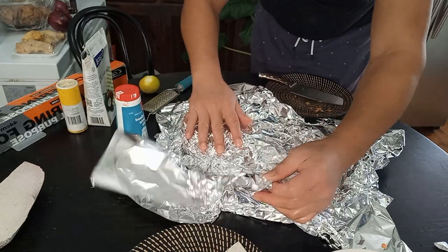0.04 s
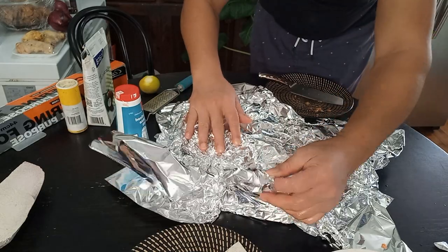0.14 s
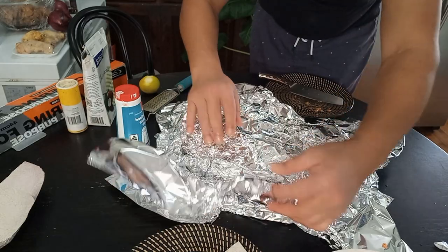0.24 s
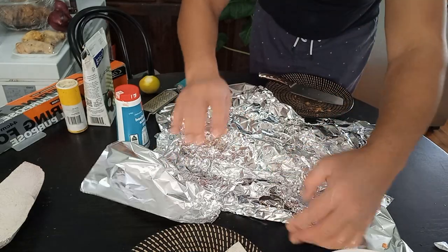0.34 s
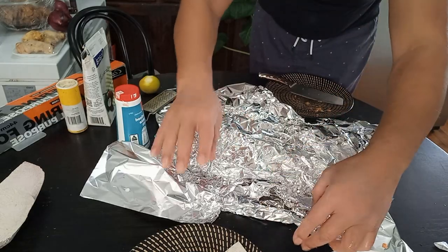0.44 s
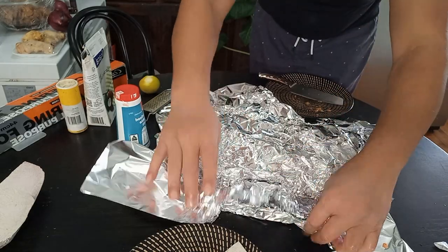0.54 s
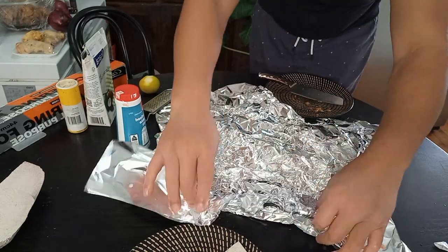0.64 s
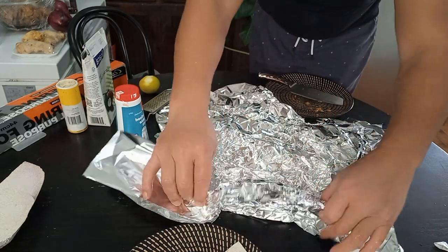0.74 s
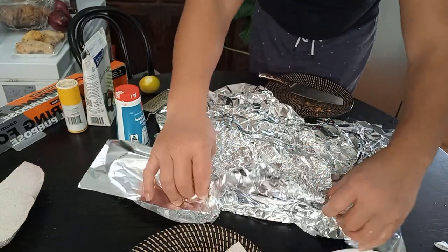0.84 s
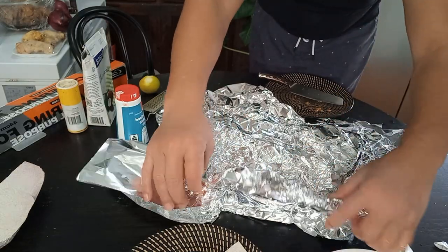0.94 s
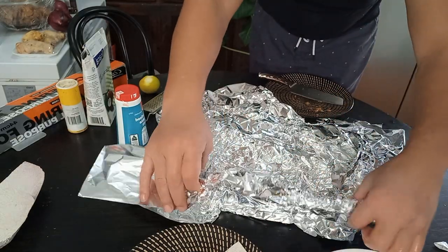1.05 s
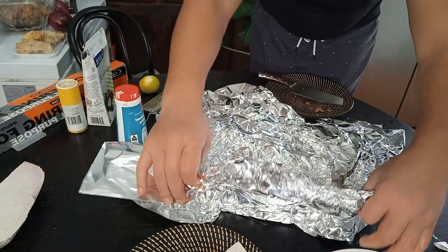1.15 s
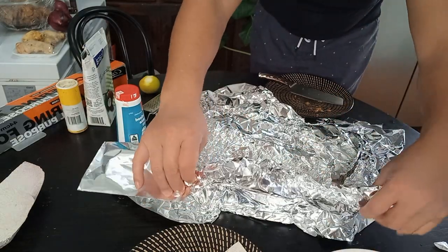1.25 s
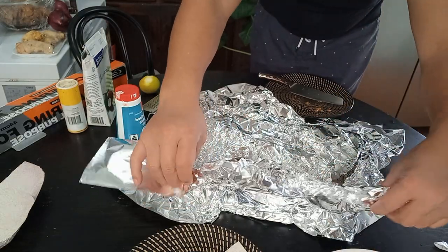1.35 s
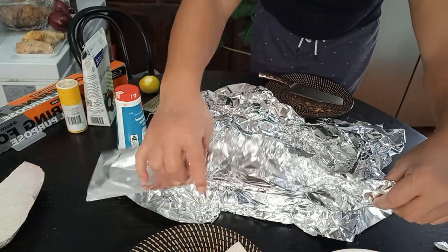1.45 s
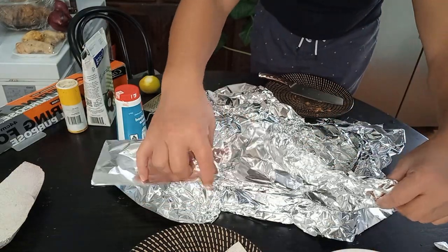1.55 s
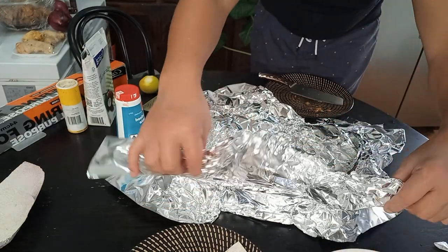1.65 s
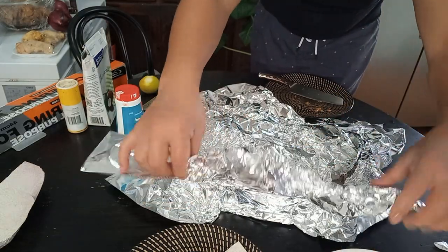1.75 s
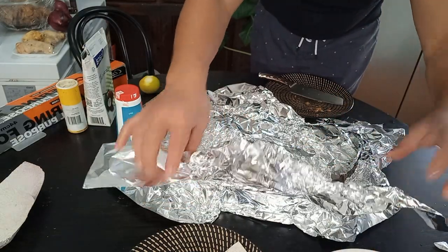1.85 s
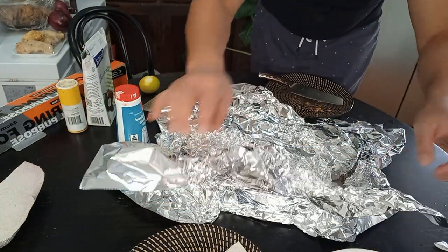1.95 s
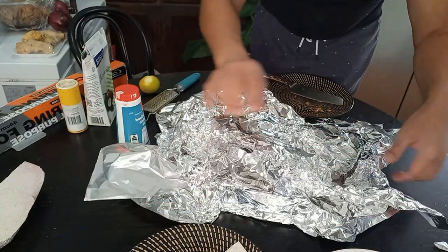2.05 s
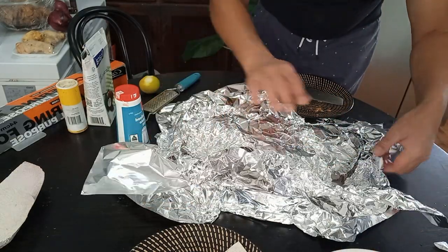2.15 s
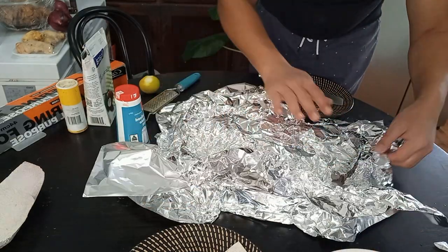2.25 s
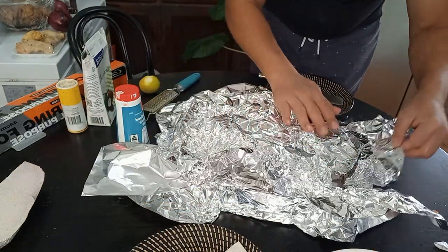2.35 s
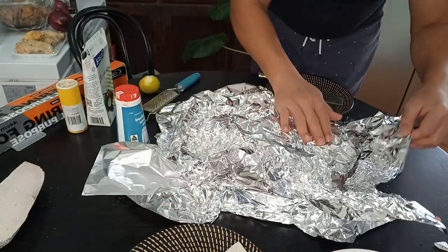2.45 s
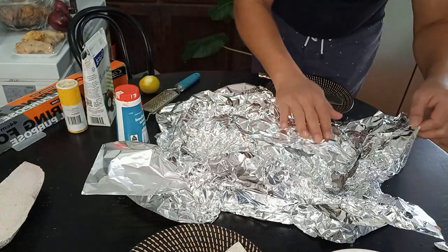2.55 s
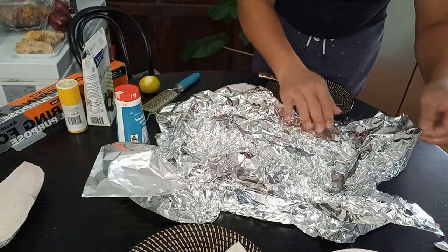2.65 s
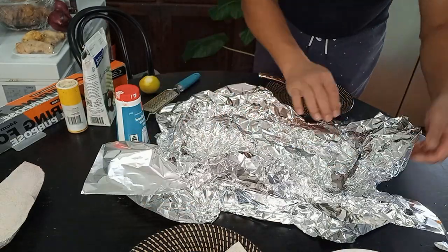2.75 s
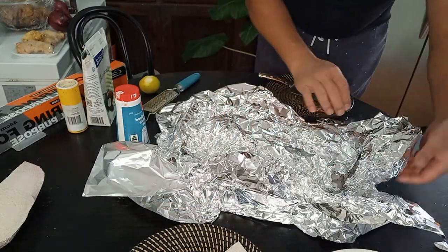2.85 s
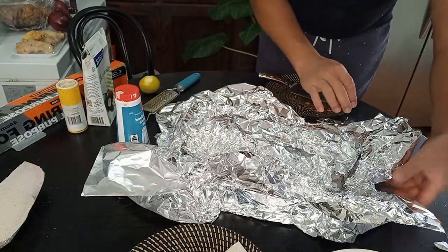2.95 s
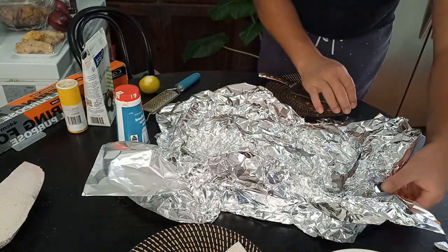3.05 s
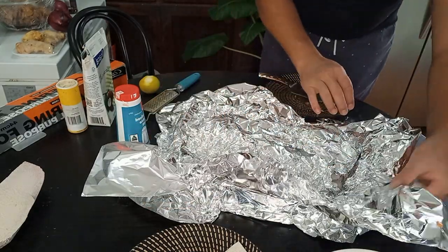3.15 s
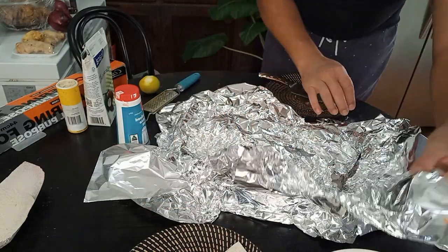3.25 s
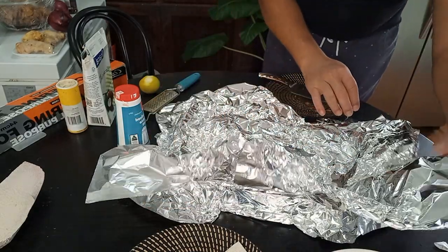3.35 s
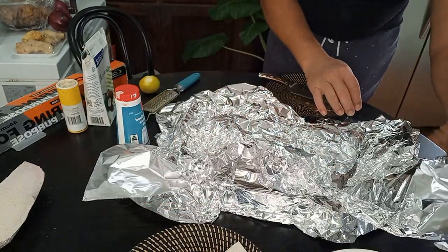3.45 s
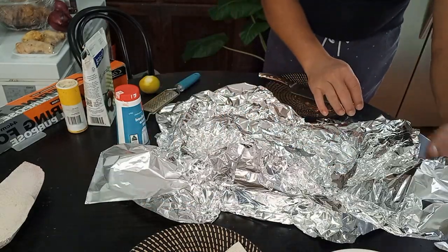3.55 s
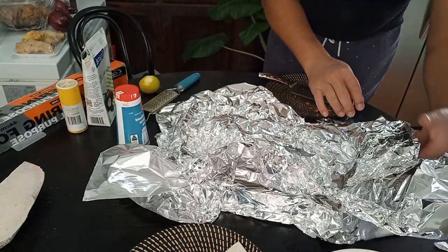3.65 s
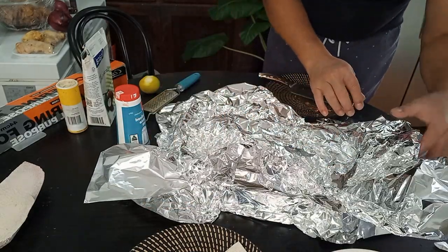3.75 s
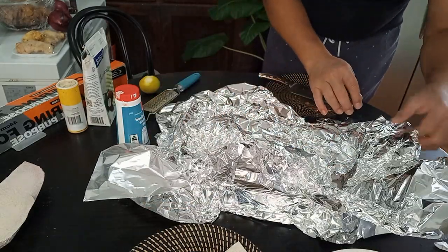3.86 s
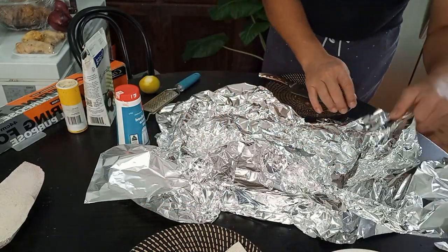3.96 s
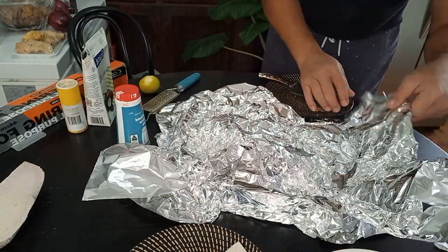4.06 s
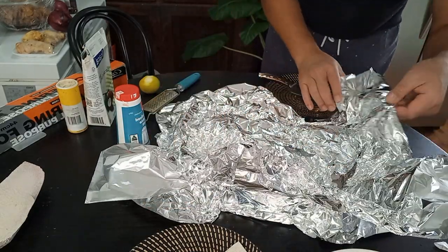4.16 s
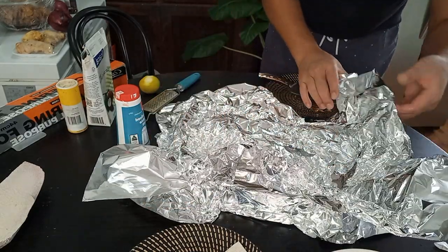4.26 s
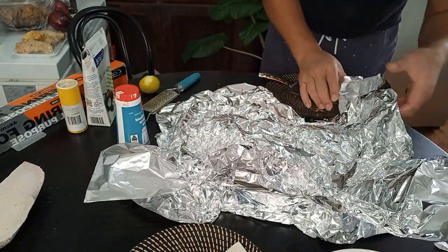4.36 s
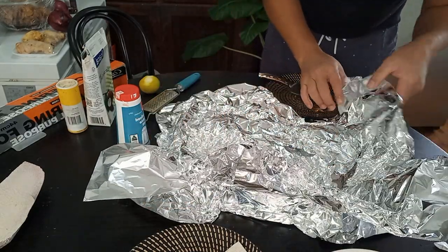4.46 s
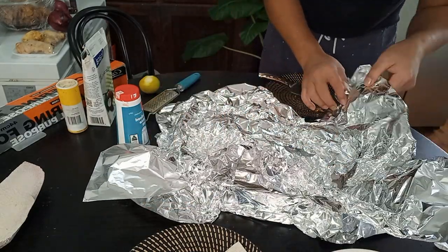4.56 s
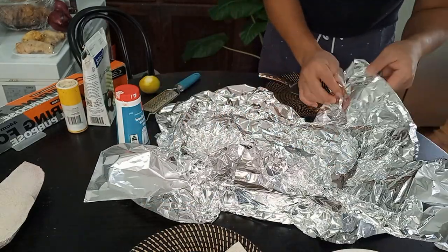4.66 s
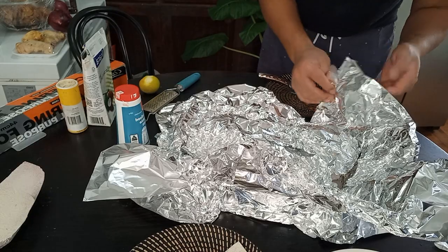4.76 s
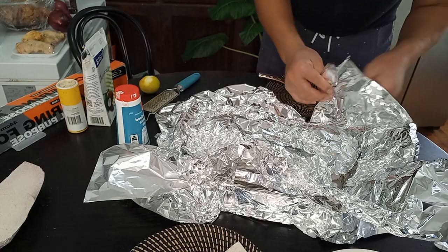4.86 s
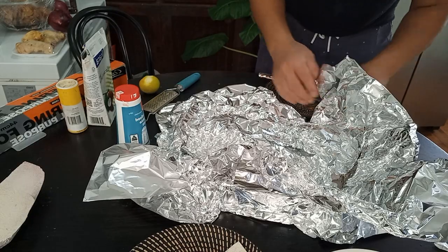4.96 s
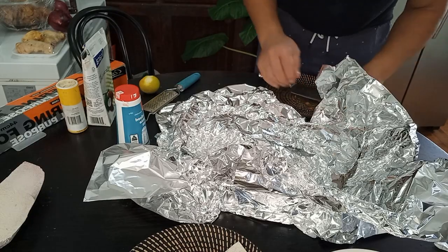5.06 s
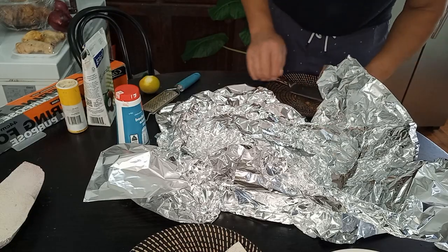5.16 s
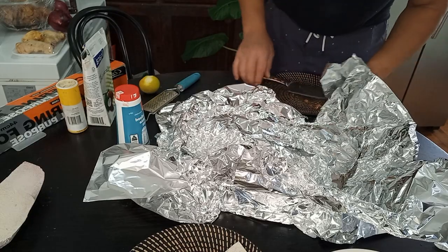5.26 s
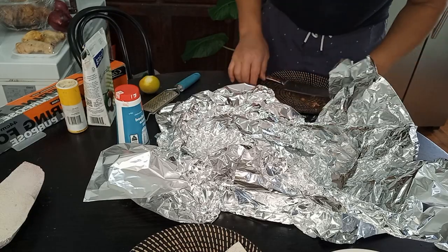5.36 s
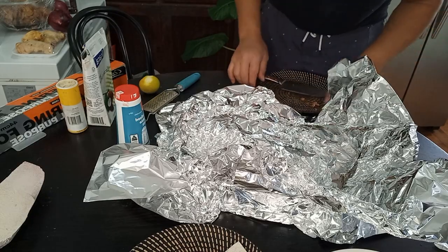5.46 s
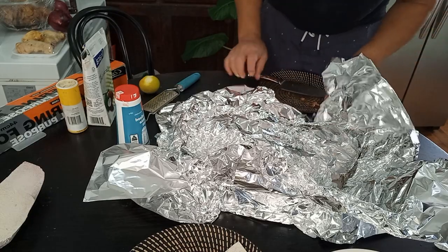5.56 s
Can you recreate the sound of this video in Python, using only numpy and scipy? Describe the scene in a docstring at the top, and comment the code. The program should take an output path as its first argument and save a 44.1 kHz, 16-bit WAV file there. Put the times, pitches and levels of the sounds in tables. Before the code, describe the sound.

Close, crisp crackling of aluminium foil comes in uneven strokes as two hands flatten and fold it. Creases snap and wider patches buckle and pop, with a few faint low thuds on the table beneath. Toward the end a woven tray briefly bumps and scrapes along the tabletop, its rim squeaking faintly under the last crinkles. The kitchen adds a short echo and a very soft rumble.

```python
"""A big crumpled sheet of aluminium foil is pressed, pulled and folded by two hands on a kitchen table.
Thousands of tiny creases snap in each stroke, wider facets (flat patches) buckle and pop, and the
hard room blends them. Now and then the weight of a hand thuds on the table. Near the end a woven
tray is nudged along the table top, with a hollow judder and a faint squeak. The room rumbles softly."""
import sys
import numpy as np
from scipy import signal
from scipy.fft import rfft, irfft, next_fast_len
from scipy.io import wavfile

SR = 44100
rng = np.random.default_rng(int(sys.argv[2]) if len(sys.argv) > 2 else 0)


def store_wav(level_fs):
    """Save 16-bit WAV to argv[1]."""
    pcm = np.round(np.clip(np.atleast_2d(level_fs), -1, 1) * 32767)
    wavfile.write(sys.argv[1], SR, pcm.T.astype(np.int16))


N = 247092
T = np.arange(N) / SR

# Levels in the tables are relative: the functions add their own gains.
# Each push or pull of the hands: (start [s], length [s], fine crease level [dB], swell [dB],
# facets relative to fine creases [dB], whole-sheet flexing relative to fine creases [dB])
HAND_STROKES = [(-0.036, 0.033, -22, 0.5, -5, -10), (0.019, 0.14, -37, 2, -8.5, -19.5),
                (0.192, 0.1, -40, 0, -7.5, -23.5), (0.32, 0.11, -50.5, 0, -17.5, -24),
                (0.584, 0.076, -40.5, -4, -17, -22), (0.668, 0.15, -30, -1, -8, -16.5),
                (0.825, 0.15, -25.5, -8.5, -8.5, -17), (0.952, 0.15, -35, 2, -11, -24.5),
                (1.107, 0.28, -35.5, -4, -10, -21.5), (1.383, 0.33, -31, -0.5, -10.5, -22),
                (1.742, 0.074, -35, 2, -9, -21), (1.856, 0.15, -40, -18, -7.5, -25),
                (2.13, 0.06, -61, 8, -12, -16), (2.188, 0.217, -46.5, 15, -5.5, -17),
                (2.415, 0.17, -35, 3.5, -7, -15), (2.602, 0.1, -48.5, 1, -9, -20.5),
                (2.891, 0.099, -50.5, 9, -6.5, -16), (3.008, 0.28, -47, 18, -11, -21.5),
                (3.282, 0.1, -29.5, 1, -8, -13.5), (3.622, 0.13, -34, -10.5, -6, -21.5),
                (3.888, 0.18, -46.5, 12, -12.5, -21.5), (4.091, 0.15, -27.5, -9, -9.5, -17.5),
                (4.233, 0.085, -44, 5, -15, -19.5), (4.47, 0.075, -44.5, 9.5, -25, -30),
                (4.524, 0.23, -33.5, 4, -8.5, -13.5), (4.798, 0.17, -30.5, -14.5, -8.5, -19),
                (4.968, 0.36, -53, 7, -14, -19), (5.188, 0.24, -39, -7, -8.5, -15),
                (5.418, 0.12, -51.5, -11, -0.5, -0.5), (5.522, 0.084, -55.5, 24, -12, -19)]
# How long the fingers take to grip: (fine creases [s], facets [s], whole sheet [s])
GRIP_TIMES = (0.039, 0.038, 0.041)
# How long the foil takes to fade 60 dB once let go: (fine creases [s], facets [s], whole sheet [s])
SETTLE_TIMES = (0.16, 0.17, 0.17)
# A fold gives way: (time [s], level [dB])
FOLD_SNAPS = [(0.115, -28.5), (0.354, -36), (0.403, -31.5), (0.471, -39.5), (0.545, -48), (0.601, -38.5),
              (0.687, -31), (1.081, -24), (1.394, -23), (1.619, -18.5), (1.777, -30), (1.798, -29),
              (1.884, -28), (2.04, -50), (2.165, -44), (2.179, -42), (2.217, -33.5), (2.789, -41.5),
              (2.913, -36), (2.964, -35.5), (3.044, -30), (3.131, -26.5), (3.315, -20), (3.528, -45),
              (3.636, -42), (4.124, -27), (4.489, -35), (4.833, -38), (5.204, -38), (5.581, -32)]
# A panel of the sheet flips over or is patted down: (time [s], level [dB], pitch [Hz])
PANEL_POPS = [(0.001, -16, 461), (0.002, -32, 333), (0.009, -19, 548), (0.012, -27, 1090),
              (0.028, -30, 594), (0.703, -28.5, 690), (0.72, -31, 414), (0.727, -27, 617),
              (0.868, -29, 1340), (0.875, -33.5, 483), (0.934, -32, 1120), (2.407, -24.5, 690),
              (2.486, -29.5, 1100), (2.511, -37, 617), (2.591, -23.5, 2380), (3.082, -40, 586),
              (3.315, -26.5, 1570), (3.357, -31, 990), (3.371, -30.5, 437), (3.734, -35.5, 686),
              (4.605, -33.5, 374), (4.637, -31, 510), (4.652, -26, 435), (4.68, -28.5, 426),
              (4.704, -30, 368), (4.833, -32.5, 537)]
# A hand lands on the table: (time [s], level [dB], pitch [Hz])
HAND_THUDS = [(1.03, -54, 60), (1.59, -48, 56.4), (1.65, -63, 68.6), (3.32, -48, 70.6), (4.12, -55, 83),
              (4.57, -60, 60), (5.48, -53.5, 104)]
# The tray catches and slips: (time [s], level [dB], pitch [Hz])
TRAY_BUMPS = [(5.11, -55.5, 323), (5.287, -39.5, 260), (5.307, -35.5, 270), (5.335, -40, 267),
              (5.356, -39, 330), (5.435, -37.5, 238), (5.448, -43, 152), (5.455, -42, 313),
              (5.47, -43, 304)]
# The tray rubs along the table: (time [s], level [dB])
TRAY_RUB = [(5.17, -76), (5.23, -57), (5.3, -51.5), (5.39, -59.5), (5.47, -53), (5.51, -63), (5.6, -60)]
# The tray's rim squeaks: (time [s], pitch [Hz], level [dB])
RIM_SQUEAK = [(5.42, 1300, -83), (5.45, 1290, -60), (5.51, 1260, -68), (5.54, 1200, -59), (5.58, 1207, -61),
              (5.6, 1240, -56)]
# The tone of fine creases, facets, flexing sheet, tray and quiet room: (frequency [Hz], level [dB])
CREASE_SPECTRUM = [(400, -20), (1500, -18), (3000, -8.5), (4300, -3), (6700, -3), (7500, -0.7), (8150, -5),
                   (8800, -5), (10200, -2.5), (12300, 0), (14000, 0), (16000, -2)]
FACET_SPECTRUM = [(200, -45), (600, -15.5), (1100, -4), (1700, -1), (2500, -2.5), (3600, -4.5),
                  (7000, -16.5)]
FLEX_SPECTRUM = [(50, -38), (130, -17), (240, -11), (370, -2), (540, 0), (800, -1.5), (1200, -13.5),
                 (3000, -42)]
TRAY_SPECTRUM = [(50, -31), (140, -11), (210, -15), (280, -4.5), (360, -1.5), (480, -34), (800, -27),
                 (2000, -43)]
ROOM_SPECTRUM = [(20, -20), (36, -5), (48, -7), (62, 5.5), (75, -7), (100, -6.5), (130, -9), (250, -15.5),
                 (600, -18), (1100, -19.5), (2000, -24.5), (4000, -36), (16000, -36)]
# How long the kitchen's echo lasts: (frequency [Hz], time to fade 60 dB [s])
ROOM_DECAY = [(250, 0.18), (700, 0.25), (1800, 0.3), (4500, 0.34), (8000, 0.34), (14000, 0.19)]


def amp(db):
    """Turns decibels into a gain to multiply by."""
    return 10 ** (np.asarray(db) / 20)


def unit_rms(x):
    """Scales a signal so that its average level (rms) is 1."""
    return x / np.sqrt(np.mean(x ** 2) + 1e-20)


def value_at(table, hz):
    """Looks up a table's value on a log-frequency axis."""
    table_hz, values = np.transpose(table)
    return np.interp(np.log(hz + 1), np.log(table_hz), values)


def follow(table):
    """Joins a table's timed points with straight lines, one curve per column."""
    times, *columns = np.transpose(table)
    return [np.interp(T, times, column) for column in columns]


def add(mix, start_s, sound):
    """Mixes a sound into every channel at the given time."""
    part = mix[:, max(round(start_s * SR), 0):][:, :sound.shape[-1]]
    part += sound[..., :part.shape[1]]


def colour(x, spectrum):
    """Gives a flat signal the tone of a spectrum table, at rms 1."""
    size = next_fast_len(N)
    gain = amp(value_at(spectrum, np.fft.rfftfreq(size, 1 / SR)))
    return unit_rms(irfft(rfft(x, size) * gain, size)[:, :N])


def diffuse(spectra, hz, ear_gap_s=0.00042):
    """Sound from all sides: left and right share the bass but not the treble."""
    shared = .88 * np.sinc(2 * hz * ear_gap_s)
    return np.array([spectra[0], shared * spectra[0] + np.sqrt(1 - shared ** 2) * spectra[1]])


def flicker(depth_db, per_s):
    """A factor that wanders at random around 1."""
    points = rng.standard_normal(4096)
    return amp(depth_db * np.interp(T * per_s, np.arange(len(points)), points))


def crackle(per_s, spread_db, ring_s, size=96, count=50000):
    """Clicks at random moments and places: most are tiny, and each rings in its own way."""
    wait, strength = rng.exponential(1, (2, count))
    place = rng.standard_normal(count)
    rings = rng.standard_normal((count, size)) * np.exp(-np.arange(size) / SR / ring_s)
    start = (np.cumsum(wait) / per_s * SR).astype(int)
    heard = start < N
    clicks = (rings * amp(spread_db * np.minimum(strength, 4))[:, None])[heard]
    left = start[heard, None] + np.arange(size)
    right_lead = np.round(6 + 2 * place[heard, None]).astype(int)  # samples
    right = abs(left - right_lead)
    return np.array([np.bincount(at.ravel(), clicks.ravel(), N)[:N] for at in (left, right)])


def knocks(table, gain_db, ring_s, overtone_db, crack_db, rise_s, count=12):
    """A struck panel cracks, then rings with one main tone and a cluster of others, mostly higher."""
    out, t = np.zeros((2, N)), np.arange(SR // 3) / SR
    for start, level_db, hz in table:
        fade_s = ring_s * (500 / hz) ** 0.25  # ring_s holds at 500 Hz; higher knocks die sooner
        ratios = 2 ** rng.uniform(-0.19, 1.4, (count, 1))
        cluster = np.sin(2 * np.pi * hz * ratios * t).T @ rng.choice([-1, 1], count) / np.sqrt(count)
        ring = (np.sin(2 * np.pi * hz * t) + amp(overtone_db) * cluster) * amp(-60 * t / fade_s)
        ring *= 1 - np.exp(-t / rise_s)
        crack = rng.standard_normal((2, len(t))) * np.exp(-t / 0.001)
        add(out, start, amp(level_db + gain_db) * (ring + amp(crack_db) * crack))
    return out


def room_rumble(level_db):
    """The low rumble of the quiet kitchen comes from all sides."""
    noise = diffuse(rfft(rng.standard_normal((2, N))), np.fft.rfftfreq(N, 1 / SR))
    return amp(level_db) * colour(irfft(noise, N), ROOM_SPECTRUM)


def echoes(x, near_db, near_fade_s, tail_db):
    """A sound's quick echoes off the table and the sheet, then the room's longer tail."""
    hz, t, noise = signal.stft(rng.standard_normal((2, SR // 2)), SR, nperseg=256)
    noise = diffuse(noise, hz[:, None])
    tail = signal.istft(noise * amp(-60 * t / value_at(ROOM_DECAY, hz)[:, None]), SR)[1]
    age = np.arange(tail.shape[1]) / SR
    tail *= np.clip(age / 0.0052 - 1, 0, 1)  # the walls answer a little later
    near = signal.istft(noise, SR)[1] * amp(-60 * age / near_fade_s)
    response = (amp(tail_db) * unit_rms(tail) + amp(near_db) * unit_rms(near)) / np.sqrt(len(age))
    return signal.oaconvolve(x, response, axes=1)[:, :N]


def wandering_echoes(x, direct_db, spots=12):
    """The sound wanders over the sheet, and each spot has its own echoes."""
    out = amp(direct_db) * x
    position = np.cumsum(flicker(depth_db=3, per_s=40)) * 90 / SR
    for spot in range(spots):
        share = np.sin(np.pi / 2 * np.minimum((position - spot) % spots, 2))  # total power stays even
        out += echoes(x * share, near_db=-5.5, near_fade_s=0.043, tail_db=-5.0)
    return out


def table_thuds():
    """The weight of a hand makes the table ring, low and soft."""
    return knocks(HAND_THUDS, gain_db=-4.5, ring_s=0.16, overtone_db=1.5, crack_db=-40, rise_s=0.011)


def sliding_tray():
    """Small slips shake the hollow tray, larger ones bump, and the rim squeaks unsteadily."""
    rub_db, = follow(TRAY_RUB)
    rub = colour(crackle(per_s=330, spread_db=0.0, ring_s=0.00072), TRAY_SPECTRUM) * amp(rub_db)
    squeak_hz, squeak_db = follow(RIM_SQUEAK)
    unsteady_hz = squeak_hz * flicker(depth_db=0.5, per_s=220)
    squeak = np.sqrt(2) * np.sin(2 * np.pi * np.cumsum(unsteady_hz) / SR) * amp(squeak_db)
    bumps = knocks(TRAY_BUMPS, gain_db=-3.5, ring_s=0.061, overtone_db=-9, crack_db=-23, rise_s=0.00073)
    return rub * (T > TRAY_RUB[0][0]) + squeak * (T > RIM_SQUEAK[0][0]) + bumps


def panel_pops():
    """A panel of foil flips over or is patted down, with a crack and a short ring."""
    return knocks(PANEL_POPS, gain_db=-5, ring_s=0.044, overtone_db=-4, crack_db=0, rise_s=0.00066)


def fold_snaps(gain_db, rise_s, fade_s):
    """A fold gives way and sets off a quick run of creases that dies away."""
    runs, age = np.zeros((1, N)), np.arange(SR // 4) / SR
    for start, level_db in FOLD_SNAPS:
        add(runs, start, np.minimum(age / rise_s, 1) * amp(level_db - 60 * age / fade_s))
    creases = colour(crackle(per_s=5000, spread_db=3.0, ring_s=0.00046), CREASE_SPECTRUM)
    return creases * runs * amp(gain_db)


def hand_stroke(start, length, level_db, swell_db, facet_db, flex_db):
    """Gains of the three foil layers: the fingers grip, press harder or ease off, then let go."""
    age = T - start
    grip = np.clip(age / np.vstack(GRIP_TIMES), 0, 1)
    pressure_db = level_db + swell_db * np.clip(age / length, 0, 1)
    settle_db = -60 * np.maximum(age - length, 0) / np.vstack(SETTLE_TIMES)
    return grip * amp(np.vstack([0, facet_db, flex_db]) + pressure_db + settle_db)


def foil_crinkle():
    """Each stroke snaps fine creases, buckles wider facets and flexes the whole sheet."""
    crease_gain, facet_gain, flex_gain = np.sqrt(sum(hand_stroke(*row) ** 2 for row in HAND_STROKES))
    creases = colour(crackle(per_s=4500, spread_db=3.0, ring_s=0.00039), CREASE_SPECTRUM) * amp(-0.35)
    facets = colour(crackle(per_s=2200, spread_db=3.5, ring_s=0.00068), FACET_SPECTRUM) * amp(-0.8)
    flex = colour(crackle(per_s=1200, spread_db=2.0, ring_s=0.00095), FLEX_SPECTRUM) * amp(-2.0)
    flurries = flicker(depth_db=1.64, per_s=110)  # one crease sets off its neighbours
    return (creases * crease_gain + facets * facet_gain + flex * flex_gain) * flurries


def scene():
    """Mixes the foil, the tray and the table in the kitchen."""
    foil = foil_crinkle() + fold_snaps(gain_db=-2.5, rise_s=0.0024, fade_s=0.072) + panel_pops()
    tray = sliding_tray()
    tray = amp(-1.0) * tray + echoes(tray, near_db=-7, near_fade_s=0.044, tail_db=-5.0)
    thuds = table_thuds()
    # left minus right, as the hands move
    balance_db = np.interp(T, [1.7, 2.4, 3.7, 4.3], [0.99, -0.51, -0.34, 0.15])
    foil = wandering_echoes(foil, direct_db=-5.0) * amp(np.outer([.5, -.5], balance_db))
    return foil + tray + thuds + room_rumble(level_db=-69.5)


def record(dry, cutoff_hz=15900):
    """Cuts off the very highest treble."""
    lowpass = signal.firwin(511, cutoff_hz, window=("kaiser", 9), fs=SR)
    return signal.oaconvolve(dry, lowpass[None], "same")


dry = scene()
out = record(dry)
store_wav(out)
```